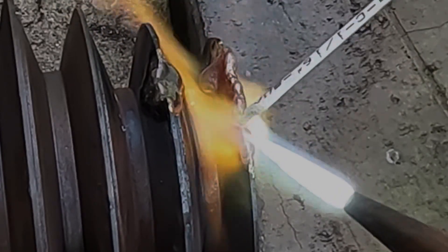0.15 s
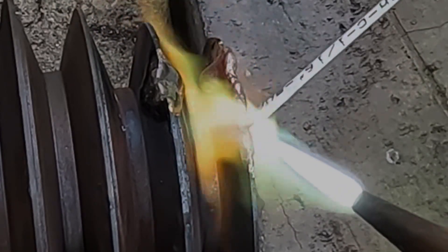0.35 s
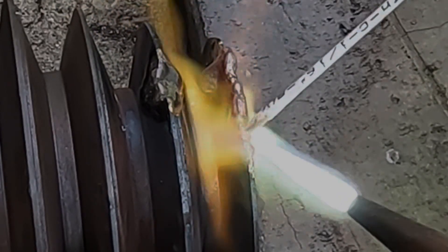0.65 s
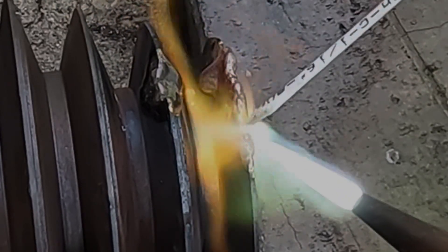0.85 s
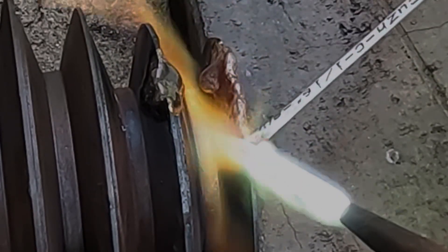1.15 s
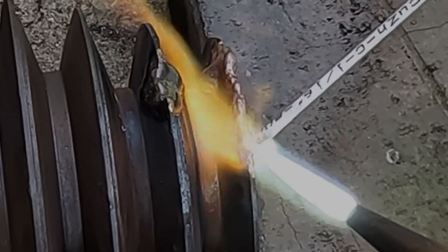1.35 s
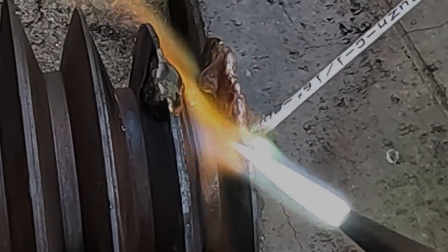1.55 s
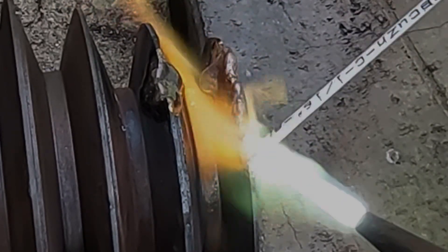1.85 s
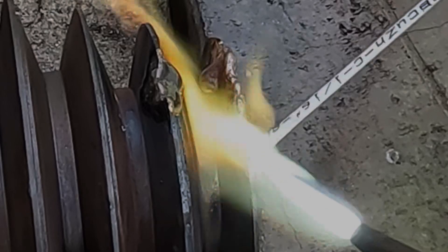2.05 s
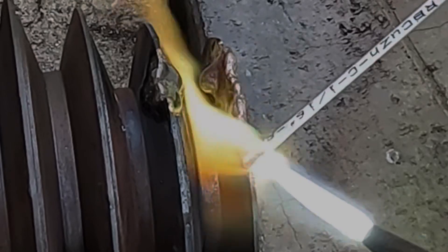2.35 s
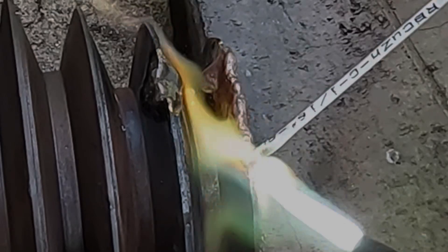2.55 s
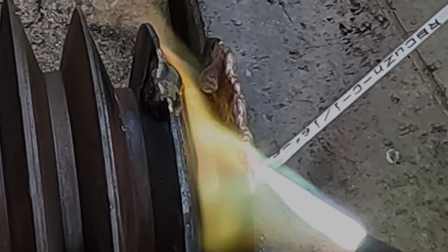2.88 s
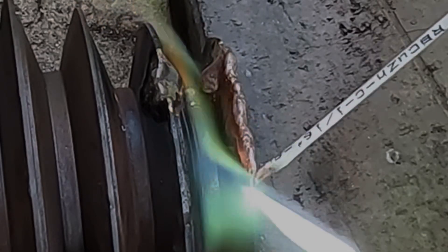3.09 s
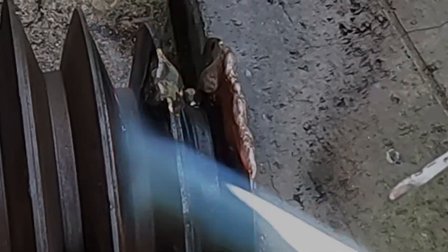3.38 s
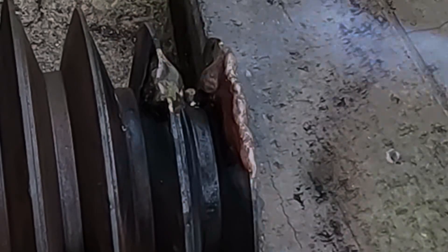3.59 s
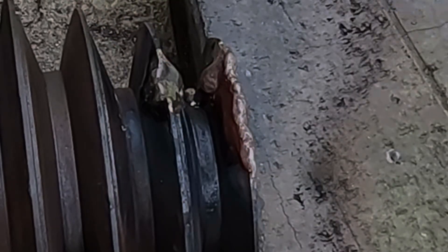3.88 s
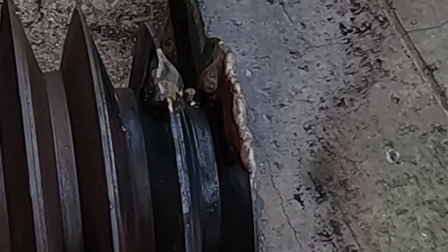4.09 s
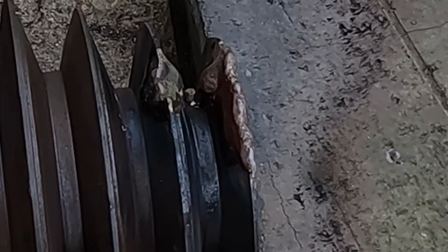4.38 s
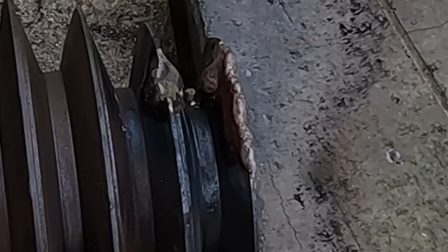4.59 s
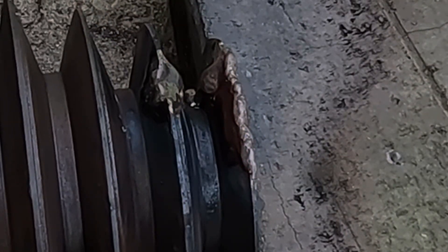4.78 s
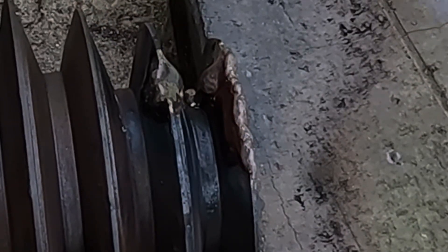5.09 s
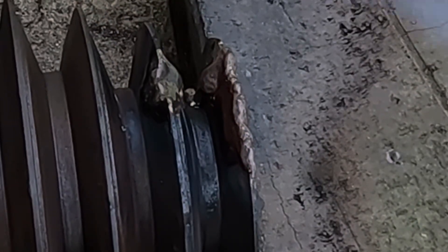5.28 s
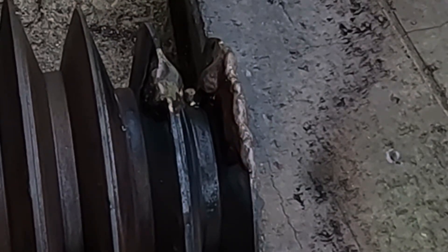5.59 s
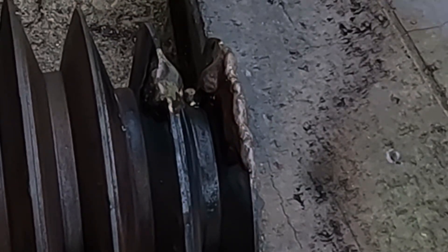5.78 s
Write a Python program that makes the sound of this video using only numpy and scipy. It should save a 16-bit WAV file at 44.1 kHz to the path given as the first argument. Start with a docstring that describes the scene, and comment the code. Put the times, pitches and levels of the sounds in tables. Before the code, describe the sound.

A gas torch roars and hisses close by, crackling with pops and spits, with windy low thumps and later a few dull bumps.

```python
"""A gas torch close by, two microphones on a stand: the flame plays on a grooved steel part.
It rumbles and roars in gusts over the hiss of the jet, both filtered noise; wind is low noise, stronger on the right.
Pops and spits, short bursts of filtered noise, run throughout; single wind pushes crowd in from 2.2 s to 3 s.
Past 3.1 s the torch is turned away and burns free, its upper resonance now lower in pitch.
From 3.6 s on the stand is knocked three times: a low decaying ring, opposite in the two microphones."""
import sys
import numpy as np
from scipy import signal
from scipy.io import wavfile

SR = 44100
rng = np.random.default_rng(int(sys.argv[2]) if len(sys.argv) > 2 else 0)


def unload_wav(signal):
    """Save mono or channel-first audio to the path in sys.argv[1] as 16-bit WAV at rate SR, clipped to [-1, 1]."""
    wavfile.write(
        sys.argv[1],
        SR,
        np.round(np.clip(np.atleast_2d(signal).T, -1, 1) * 32767).astype(np.int16),
    )


N = 261954
LEAD = 150   # samples of a burst before its onset


def from_db(db):
    """Amplitude factor of a level in dB."""
    return 10 ** (np.asarray(db) / 20)


def rms_one(x):
    """Scales a sound to rms 1."""
    return x / np.sqrt(np.mean(x ** 2) + 1e-20)


def in_time(rows):
    """Draws each column after the time as a line over the whole scene."""
    s, *columns = np.transpose(rows)
    return [np.interp(np.arange(N) / SR, s, column) for column in columns]


def at_hz(points, hz):
    """Reads a curve between its points, on a logarithmic frequency axis."""
    curve_hz, values = np.transpose(points)
    return np.interp(np.log(hz), np.log(curve_hz), values)


def panned(x, pan_db):
    """Sets left against right by pan_db, half on each side; negative is stronger on the right."""
    return x * from_db(np.array([[.5], [-.5]]) * pan_db)


def band(low_hz, high_hz):
    """Band-pass filter."""
    return signal.butter(2, [low_hz, high_hz], "band", fs=SR, output="sos")


def drift(rate_hz):
    """Slow chance: noise at every 20th sample through a double one-pole low-pass; spread 1."""
    r = np.exp(-40 * np.pi * rate_hz / SR)
    white = rng.standard_normal(N // 20 + 2002)
    slow = signal.lfilter([1], [1, -2 * r, r * r], white)[2000:]
    return np.interp(np.arange(N) / 20, np.arange(len(slow)), rms_one(slow))


def resonate(x, hz, width_hz):
    """Two-pole resonance, gain 1 on top."""
    r = np.exp(-np.pi * width_hz / SR)
    zeros = np.array([1, 0, -1]) * (1 - r * r) / 2
    poles = [1, -2 * r * np.cos(2 * np.pi * hz / SR), r * r]
    return signal.lfilter(zeros, poles, x)


def left_right(mid, side, likeness):
    """Spreads two noises over left and right, alike to the given degree."""
    alike = np.clip(likeness, 0, 1)
    return np.sqrt(1 + alike) * mid + np.sqrt(1 - alike) * side * [[1], [-1]]


def pair(likeness):
    """Left and right noise, partly alike."""
    mid, side = rng.standard_normal((2, N))
    return left_right(mid, side, likeness)


def add(out, s, sound):
    """Mixes a short stereo sound in from time s."""
    i = round(s * SR)
    out[:, i:i + sound.shape[1]] += sound[:, :N - i]


def bands(spectrum, edges, likeness, pan, shared_db, own_db, patchy_db, tilt_db):
    """A bank of noise bands, each with its level, likeness, side, flicker and slow patches; rms 1 in mono."""
    out, white = 0, rng.standard_normal((2, 2, N))
    centre_hz = np.sqrt(edges[0] * edges[-1])
    for k, (low, high) in enumerate(zip(edges, edges[1:])):
        mid, side = signal.sosfilt(band(low, high), white[k % 2])   # neighbours get unrelated noise
        hz = np.sqrt(low * high)
        both = left_right(mid, side, at_hz(likeness, hz))
        level_db = at_hz(spectrum, hz) + tilt_db * np.log2(hz / centre_hz)
        flicker_db = shared_db + own_db * drift(8.3) + patchy_db * drift(2.45)
        out = out + from_db(level_db + flicker_db) * panned(both, at_hz(pan, hz))
    return out / np.sqrt(np.mean(out.mean(axis=0) ** 2))


def burst(shape, rise_ms, fall_ms, noise):
    """A puff of noise that swells and dies, filtered forwards and backwards; peak 1."""
    ms = np.maximum(np.arange(len(noise)) - LEAD, 0) / SR * 1000
    envelope = (1 - np.exp(-ms / rise_ms)) * np.exp(-ms / fall_ms)
    puff = signal.sosfiltfilt(shape, noise * envelope)
    return puff / np.abs(puff).max()


# Strength of the burning: (time [s], rumble [dB], roar [dB], upper roar [dB])
FLAME_LEVELS = [(0, -34.5, -48.5, -51), (.38, -36.5, -43, -50.5), (.6, -36, -47, -54), (1, -36, -46, -49.5),
                (1.62, -36.5, -48, -56.5), (1.74, -35.5, -43.5, -50.5), (2.18, -37.5, -45.5, -47),
                (2.23, -30.5, -34.5, -38.5), (2.305, -31, -40.5, -36.5), (2.33, -34.5, -39.5, -46),
                (2.95, -35, -43.5, -46), (3.06, -36, -44, -51.5), (3.23, -31.5, -40, -50.5),
                (3.45, -36, -44, -42), (3.59, -25.5, -36, -41.5), (3.67, -29.5, -40.5, -48),
                (3.9, -27, -39.5, -43.5), (4.22, -31, -45.5, -45.5), (4.32, -27.5, -39.5, -44),
                (4.5, -28, -40.5, -45.5), (4.71, -25.5, -33, -39.5), (4.8, -31.5, -43.5, -49.5),
                (5.04, -25.5, -39, -42), (5.17, -29.5, -43.5, -49.5), (5.5, -28.5, -40.5, -46),
                (5.94, -24.5, -38.5, -43.5)]
# Aim of the torch: (time [s], share of free burning [0 full on the work to 1 free])
TURNED_AWAY = [(0, 0.37), (1.5, 0.18), (1.7, .05), (3.1, 0.05), (3.6, 0.91), (4.2, 0.99), (4.5, 1),
               (5.94, 0.86)]
# Colour of the rumble: (frequency [Hz], level [dB per Hz])
RUMBLE_SPECTRUM = [(40, -3.5), (80, -9), (130, 1.5), (220, -2.5), (310, -1.5), (430, -14), (520, -10),
                   (800, -59.5)]
# The rumble lightens and deepens: (time [s], tilt [dB per octave])
RUMBLE_TILT = [(0, 0), (2, 0.3), (3.1, 1.5), (4.15, 1.5), (4.8, -0.8), (5.94, -1.5)]
# Two lower resonances of the roar: (frequency [Hz], width [Hz], level [dB])
ROAR_MODES = [(670.5, 140, 5.5), (966, 220, 2.5)]
UPPER_ON_WORK, UPPER_FREE = (1470, 400), (1215, 250)   # third resonance (Hz, width Hz); on the work passed twice
# Faint fourth resonance of the free flame, passed twice (Hz, width Hz), and its level against the upper roar
TOP_FREE, TOP_FREE_DB = (1823, 460), -24.5
SPUTTER_BAND, SPUTTER_DB = (1680, 2770), -21   # (Hz, Hz); eddies above the roar, against the upper roar
# Hiss of the gas jet before a 2.5 dB cut: (time [s], level [dB], brightness [dB per octave])
JET_LEVELS = [(0.0, -56, -1.2), (0.69, -56, -1.3), (1.19, -54.5, -0.5), (1.93, -53, -0.5),
              (3.24, -55.5, -1), (3.47, -52, -1), (4.12, -54.5, 0), (5.51, -52.5, -1.8), (5.94, -53.5, -1)]
# Colour of the hiss: (frequency [Hz], level [dB per Hz])
HISS_SPECTRUM = [(880, -27), (1500, -13), (2080, -10), (2840, -11), (3500, -9), (7220, -16.5),
                 (8470, -24.5), (9570, -23.5), (11900, -32.5), (13200, -32), (14200, -55)]
# How alike the microphones hear the hiss: (frequency [Hz], left-right likeness [0 to 1])
HISS_LIKENESS = [(1500, 0.43), (3000, 0.59), (5000, 0.8), (8000, 0.54), (10500, 0.72), (13000, 0.23)]
# Side of the hiss: (frequency [Hz], left-right level [dB])
HISS_PAN = [(1500, -2.5), (4000, 0.5), (12000, 1.5)]


def catching_eddies():
    """Eddies of gas catch fire one by one, in clumps: uneven clicks of either sign."""
    clicks_per_s = 250 * from_db(4 * drift(25))
    caught = rng.random(N) < clicks_per_s / SR
    sizes = from_db(4 * np.minimum(rng.exponential(1, N), 3))
    return caught * sizes * rng.choice([-1, 1], N)


def roaring(roar_db, upper_db, away, throb, flutter):
    """Noise and eddies drive the resonances of the roar; the upper one drops as the flame leaves the work."""
    eddies = rms_one(catching_eddies())
    burning = pair(0.98) * from_db(2.06 * throb + 2.14 * flutter + 1.34 * drift(12)) + from_db(3.0) * eddies
    roar = 0
    for k, (hz, width_hz, db) in enumerate(ROAR_MODES):
        roar = roar + from_db(db + 1.9 * drift(19)) * resonate(burning, hz, width_hz) * (-1) ** k
    on_work = rms_one(resonate(resonate(burning, *UPPER_ON_WORK), *UPPER_ON_WORK))
    free = rms_one(resonate(burning, *UPPER_FREE))
    upper = (1 - away) * on_work + away * free
    dark_top = signal.butter(6, 1720, fs=SR, output="sos")
    body = from_db(roar_db) * rms_one(roar) + from_db(upper_db + 1.55 * drift(48)) * upper
    body = signal.sosfilt(dark_top, body)
    sputter = rms_one(signal.sosfilt(band(*SPUTTER_BAND), burning + from_db(8.0) * eddies))
    top = rms_one(resonate(resonate(burning, *TOP_FREE), *TOP_FREE))
    top = away * from_db(upper_db + TOP_FREE_DB + 3.4 * drift(15)) * top
    return body + from_db(upper_db + SPUTTER_DB) * sputter + top


def flame():
    """Turbulent burning: one flutter shakes rumble, roar and hiss together, the roar most."""
    rumble_db, roar_db, upper_db = in_time(FLAME_LEVELS)
    away, = in_time(TURNED_AWAY)
    throb, flutter = drift(37.0) + 0.63 * drift(7.1), drift(106)
    rumble = bands(RUMBLE_SPECTRUM, 40 * 2 ** np.arange(0, 4.4, 1 / 3),
                   likeness=[(40, 1.0), (800, 0.99)], pan=[(40, 1.0), (800, -2.34)],
                   shared_db=0.45 * throb + 1.6 * flutter + 1.1 * away * drift(17),
                   own_db=0.88, patchy_db=-0.66, tilt_db=in_time(RUMBLE_TILT)[0])
    roar = roaring(roar_db, upper_db, away, throb, flutter)
    jet_db, bright_db = in_time(JET_LEVELS)
    hiss = bands(HISS_SPECTRUM, 1300 * 2 ** np.arange(0, 3.6, 1 / 5), HISS_LIKENESS, HISS_PAN,
                 shared_db=0.34 * throb + 1.0 * flutter, own_db=0.95, patchy_db=1.07, tilt_db=bright_db)
    return from_db(rumble_db) * rumble + panned(roar, pan_db=-2.5) + from_db(jet_db - 2.5) * hiss


# Steady air past the microphones: (time [s], level [dB])
STEADY_WIND = [(0, -36.5), (1, -38.5), (1.9, -47), (2.7, -38.5), (3.6, -36.5), (4.2, -49), (4.8, -49),
               (5.4, -36), (5.94, -45)]
# Gusts that rise above the steady air: (time [s], peak level [dB])
GUSTS = [(.36, -31), (.63, -28.5), (.84, -27.5), (1.24, -32), (1.57, -35), (2.08, -35), (2.251, -25),
         (2.52, -26.5), (2.79, -26), (2.89, -31.5), (3.0, -29), (3.24, -39), (3.37, -27.5), (3.55, -39),
         (3.76, -30.5), (4.85, -28.5), (5.24, -39), (5.49, -26)]
# Single pushes of wind: (time [s], peak level [dB], width [ms], left-right level [dB])
BUFFETS = [(0.312, -26, 11, -8), (0.336, -28, 10.5, -7), (0.393, -26, 30, -9), (0.448, -24.5, 26, -4),
           (0.631, -24, 14, 1), (0.8357, -22, 6.5, -5), (0.907, -21.5, 11, -5), (1.22, -33, 10, -4),
           (1.565, -30, 11, -6), (2.251, -13, 8.4, -6.5), (2.485, -18, 2.6, -2), (2.498, -22.5, 11.3, -8),
           (2.532, -18.5, 7.4, -6), (2.573, -21, 9.2, -2), (2.623, -14.5, 4.3, -9), (2.722, -24, 8.4, -10),
           (2.778, -14, 9.2, -8), (2.893, -22, 15.7, -5.5), (2.991, -17.5, 13, -4), (3.0015, -15, 3.1, -6),
           (5.2397, -17.5, 7.6, -4), (5.479, -18.5, 5.6, -1), (5.559, -18, 3.4, 1.5)]
GUST_RISE_S, GUST_DIE_S = 0.072, 0.054   # time to swell and to die by 9 dB


def wind():
    """Lumpy low noise in gusts, stronger on the right, with single pushes: a swell between two dips."""
    now, level = np.arange(N) / SR, from_db(in_time(STEADY_WIND)[0])
    for s, db in GUSTS:
        slope_s = np.where(now < s, GUST_RISE_S, GUST_DIE_S)
        level = np.maximum(level, from_db(db) * np.exp(-np.abs(now - s) / slope_s))
    rush = rms_one(signal.sosfilt(band(19, 70), pair(0.81)))
    out = level * from_db(2.3 * drift(5.5)) * panned(rush, pan_db=-2.5)
    ms = np.arange(-2000, 2000) / SR * 1000
    for s, db, width_ms, pan_db in BUFFETS:
        u = (ms / (0.5 * width_ms)) ** 2
        push = (1 - u) * np.exp(-u / 2)
        add(out, s - 2000 / SR, from_db(db) * panned(push, pan_db))
    return out


# Flame pops: (time [s], level [dB], centre frequency [Hz])
POPS = [(.112, -37.5, 970), (.2175, -48, 750), (0.269, -40, 1400), (.301, -37, 1250), (0.3173, -28, 1070),
        (0.365, -35, 1200), (0.392, -30.5, 1140), (0.477, -35, 700), (0.4908, -28.5, 1110),
        (.521, -38, 1150), (.553, -38, 1290), (.6841, -26.5, 800), (0.8847, -28, 810), (0.978, -24.5, 770),
        (1.004, -34, 1400), (1.0625, -30, 710), (1.182, -38, 1170), (1.382, -31, 1310),
        (1.596, -36.5, 1420), (1.6862, -25, 1380), (1.71, -27.5, 1340), (1.9106, -26, 1190),
        (1.987, -38, 696), (2.169, -24, 1110), (2.208, -27.5, 950), (2.381, -36, 1350), (2.3998, -22, 865),
        (2.411, -30, 1480), (2.424, -28.5, 1470), (2.432, -25, 1500), (2.461, -29, 1300),
        (2.487, -33, 1480), (2.565, -35, 1440), (2.579, -41, 1490), (2.616, -33, 1480), (2.6255, -27, 1350),
        (2.648, -23, 1140), (2.6817, -29.5, 1330), (2.758, -35, 1420), (2.818, -24.5, 1160),
        (2.868, -26.5, 900), (2.94, -30, 700), (3.007, -24, 660), (3.038, -30, 730), (3.12, -29.5, 1090),
        (3.233, -26, 780), (3.4775, -25.5, 780), (3.574, -28.5, 1130), (3.788, -25.5, 760),
        (4.34, -26.5, 920), (4.364, -34.5, 1200), (4.403, -32, 1150), (4.413, -22.5, 814),
        (4.432, -22, 1040), (4.453, -32, 970), (4.546, -33, 930), (4.595, -23, 755), (4.641, -31, 850),
        (4.668, -28, 700), (4.9208, -26.5, 724), (5.018, -29, 700), (5.034, -27, 1090), (5.215, -29, 645),
        (5.4315, -34, 700), (5.46, -23.5, 740), (5.745, -29, 647)]
POP_MS, POP_SPREAD_DB_PER_OCT = 3.2, 26.5   # decay; loss in a resonance away from the pop's centre
POP_KICK = 10.4   # a pop starts with one jolt, this many times its noise
# The snap above a pop (Hz, Hz) is strongest, this far down, for pops centred at POP_TOP_HZ
POP_TOP_BAND, POP_TOP_HZ, POP_TOP_DB = (1590, 2500), 1500, -14
POP_SNAP_DB_PER_OCT = 8   # the snap fades for pops centred away from there


def pops():
    """Pockets of gas light up: dull bursts in the three resonances of the roar, a snap on top."""
    out, (away,) = np.zeros((2, N)), in_time(TURNED_AWAY)
    for (s, db, centre_hz), noise in zip(POPS, rng.standard_normal((len(POPS), 900))):
        noise = noise + POP_KICK * (np.arange(len(noise)) == LEAD + 20)
        upper_hz = np.interp(away[round(s * SR)], [0, 1], [UPPER_ON_WORK[0], UPPER_FREE[0]])
        pop = 0
        for hz in [ROAR_MODES[0][0], ROAR_MODES[1][0], upper_hz]:
            ring_db = db - POP_SPREAD_DB_PER_OCT * abs(np.log2(hz / centre_hz))
            pop = pop + from_db(ring_db) * burst(band(hz / 1.194, hz * 1.17), 0.55, POP_MS, noise)
        snap_db = db + POP_TOP_DB - POP_SNAP_DB_PER_OCT * abs(np.log2(POP_TOP_HZ / centre_hz))
        pop = pop + from_db(snap_db) * burst(band(*POP_TOP_BAND), 0.78, POP_MS, noise)
        add(out, s - LEAD / SR, panned(pop, pan_db=-2.5))
    return out


# Sharp spits, levels before a 5 dB cut and colours before they are exaggerated:
# (time [s], level [dB], ring frequency [Hz], middle colour [dB], treble colour [dB])
SPITS = [(0.2664, -38, 2020, -24, -26), (0.4755, -41, 2260, -18, -26), (0.4905, -42, 2070, -16, -24),
         (0.6589, -43, 2600, -11, -23), (0.9733, -37, 2430, -11, -28), (1.059, -36.5, 2400, -11, -22),
         (1.1104, -36, 2190, -17, -23), (1.1243, -40, 3390, -14, -25), (1.1804, -31, 2580, -12.5, -20),
         (1.35, -37, 2190, -12, -25), (1.38, -50, 2260, -7, -17), (1.4157, -36, 3700, -9, -25),
         (1.5918, -32.5, 3900, -6.5, -14), (1.683, -46, 4000, -9, -18), (1.708, -42, 4350, -5, -15),
         (1.7499, -38, 2170, -15, -23), (1.7689, -35, 2600, -12, -25), (1.9473, -36, 2260, -22, -30),
         (2.0278, -38.5, 2580, -17, -28), (2.1365, -33.5, 3350, -14, -26), (2.209, -37, 2440, -23, -20),
         (2.2393, -35, 2010, -24, -24), (2.332, -32, 1900, -20, -24), (2.434, -44, 2370, -18, -23),
         (2.46, -40, 2360, -15, -28), (2.477, -30, 2440, -14, -31), (2.5252, -40, 2510, -17, -21),
         (2.5566, -37, 2020, -19, -27), (2.5657, -32, 2450, -32, -31), (2.6244, -34, 2480, -24, -30),
         (2.6474, -36, 2000, -28, -37), (2.682, -39, 2340, -25, -29), (2.704, -41, 2020, -9, -14),
         (2.7402, -42, 2000, -11, -17), (2.7551, -36.5, 2460, -15, -18), (2.8564, -38, 2170, -21, -27),
         (2.8692, -35, 2360, -31, -29), (2.9597, -38, 2000, -22, -23), (2.9926, -35.5, 2200, -15, -20),
         (3.1193, -40, 2520, -22, -18), (3.1757, -36, 3070, -12.5, -18), (3.226, -37, 2000, -16, -18),
         (3.289, -30.5, 3130, -22, -18.5), (3.3079, -40, 3380, -19, -17), (3.3728, -34.5, 2340, -26, -19),
         (3.476, -35, 2030, -17, -25), (3.528, -40.5, 2970, -7, -12), (3.6002, -32, 2650, -17, -16),
         (3.896, -42, 2140, -11, -16), (3.93, -32.5, 2540, -15, -20), (3.9908, -35, 2750, -25, -16),
         (4.035, -38, 2040, -10.5, -20), (4.2083, -38, 2300, -20, -18), (4.3054, -37, 2050, -11, -16),
         (4.3291, -37.5, 2030, -9, -20), (4.3965, -44, 3040, -8, -10.5), (4.413, -38.5, 2730, -8, -14),
         (4.4304, -41, 1900, -17, -14), (4.563, -35, 1750, -14, -19), (4.591, -36, 2330, -15, -24),
         (4.6737, -37, 3300, -21, -26), (4.8559, -37.5, 3520, -10.5, -24), (4.946, -32.5, 3220, -27, -36),
         (5.0219, -32, 2050, -8, -31), (5.098, -38, 2700, -20, -23), (5.215, -35, 2010, -9, -18.5),
         (5.2227, -33.5, 2360, -13.5, -16), (5.2679, -33.5, 2390, -9, -33), (5.2914, -41, 2680, -8, -19),
         (5.3178, -35, 2010, -8.5, -16.5), (5.456, -38, 3000, -12, -20), (5.4963, -33, 2960, -25, -18),
         (5.5247, -37.5, 4150, -12, -18), (5.5354, -34.5, 3050, -17, -21), (5.5927, -42, 3700, -12, -22),
         (5.6067, -34, 2950, -11, -18), (5.665, -32.5, 2800, -21, -19), (5.7218, -37, 2420, -6, -10),
         (5.8112, -38, 2200, -14, -19)]
# Low, middle and top bands of the crack: (lower edge [Hz], upper edge [Hz])
SPIT_BANDS = [(1750, 3960), (3300, 5640), (5600, 10100)]
SPIT_BODY_BAND = (890, 1960)   # (Hz, Hz): each spit also kicks the top of the roar
SPIT_BODY_DB, SPIT_LOW_DB, SPIT_MIDDLE_DB, SPIT_TOP_DB = 2, -10, -7.5, -20.5   # bands of a usual spit
SPIT_MEAN_DB = (-15, -21.5)   # usual middle and treble colour
SPIT_MIDDLE_FOLLOWS, SPIT_TOP_FOLLOWS = 1.44, 1.66   # how far the two bands follow a spit's own colour
SPIT_MS, SPIT_LENGTH_SPREAD = 1.96, .35   # usual decay; its spread by chance
SPIT_RING_WIDTH_HZ = 520   # each spit rings briefly at a pitch of its own
FAINT_SPIT_DB, FAINT_RANGE_DB, FAINT_RING_HZ = -54.5, 6.5, (1850, 5230)   # before the same 5 dB cut
FAINT_FOLLOWS = 0.27   # dB per dB of upper roar


def faint_spits():
    """Rows for 300 faint spits at random times, louder while the upper roar is strong."""
    upper_db = in_time(FLAME_LEVELS)[2]
    swell_db = FAINT_FOLLOWS * (upper_db - upper_db.mean())
    starts, sizes, pitches = rng.random((300, 3)).T
    at = (LEAD + starts * (N - LEAD)).astype(int)
    db = FAINT_SPIT_DB + FAINT_RANGE_DB * sizes + swell_db[at]
    low_hz, high_hz = FAINT_RING_HZ
    ring_hz = low_hz * (high_hz / low_hz) ** pitches
    return list(zip(at / SR, db, ring_hz, *np.outer(SPIT_MEAN_DB, np.ones(len(at)))))


def spits():
    """Ticks of a few milliseconds: a short ring over a broad crack, the low part a little later on the left."""
    out, shapes = np.zeros((2, N)), [band(*edges) for edges in [SPIT_BODY_BAND] + SPIT_BANDS]
    rows = list(SPITS) + faint_spits()
    for (s, db, ring_hz, *colour_db), noise in zip(rows, rng.standard_normal((len(rows), 601))):
        firm_db, bright_db = np.subtract(colour_db, SPIT_MEAN_DB)
        levels_db = [SPIT_BODY_DB, SPIT_LOW_DB, SPIT_MIDDLE_DB + SPIT_MIDDLE_FOLLOWS * firm_db,
                     SPIT_TOP_DB + SPIT_TOP_FOLLOWS * bright_db]
        fall_ms = max(SPIT_MS * np.exp(SPIT_LENGTH_SPREAD * noise[0]), .3)
        body, low, middle, top = [from_db(level_db) * burst(shape, 0.16, fall_ms, noise[1:])
                                  for level_db, shape in zip(levels_db, shapes)]
        ring = resonate(low + middle, ring_hz, SPIT_RING_WIDTH_HZ)
        low = low + ring / np.abs(ring).max()
        late_left = np.array([np.roll(low, 2), low])   # two samples
        spit = late_left + body + middle + top
        add(out, s - LEAD / SR, from_db(db - 5) * panned(spit, pan_db=-1.0))
    return out


# Knocks on the microphone stand: (time [s], level before the soft onset and decay [dB])
KNOCKS = [(3.602, -21), (3.956, -26), (4.488, -26)]
STAND_HZ, STAND_T60_S = 140, 0.19   # pitch; time to die by 60 dB


def knocks():
    """The stand rings low and shakes the two microphones in opposite sense."""
    out, t = np.zeros((2, N)), np.arange(8000) / SR
    envelope = from_db(-60 * t / STAND_T60_S) * (1 - np.exp(-t / 0.0044))
    ring = np.sin(2 * np.pi * STAND_HZ * t) * envelope
    for s, db in KNOCKS:
        add(out, s, from_db(db) * ring * [[1], [-.8]])
    return out


def scene():
    """The torch, the wind and the knocked stand together."""
    return flame() + wind() + pops() + spits() + knocks()


CUTOFF_HZ = 14300


def record(dry):
    """The top is cut steeply."""
    steep_cut = signal.ellip(12, .5, 80, CUTOFF_HZ, fs=SR, output="sos")   # ripple 0.5 dB, floor -80 dB
    return signal.sosfilt(steep_cut, dry)


dry = scene()
out = record(dry)
unload_wav(out)
```